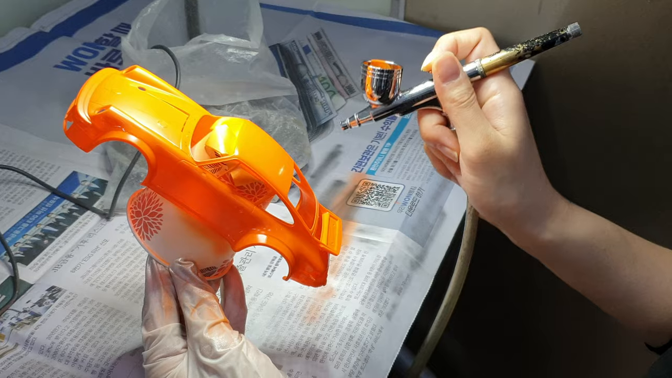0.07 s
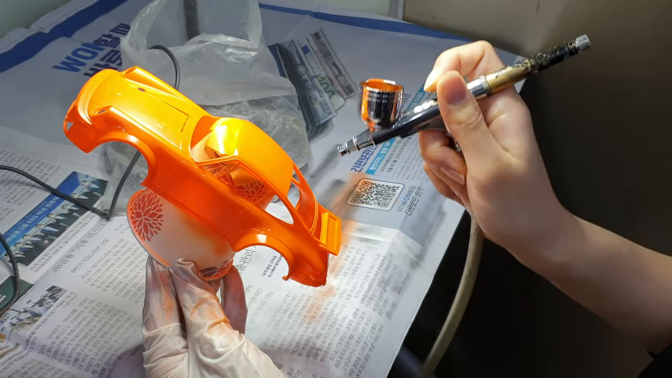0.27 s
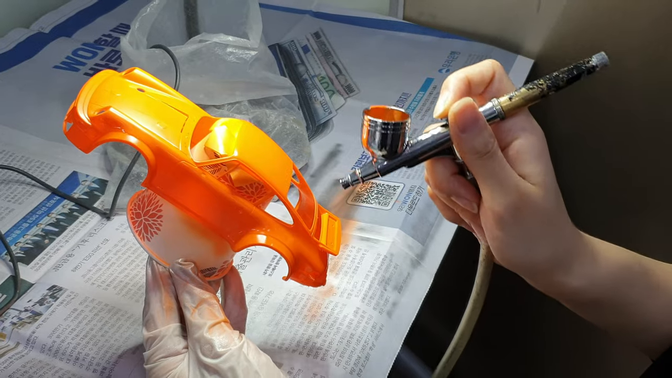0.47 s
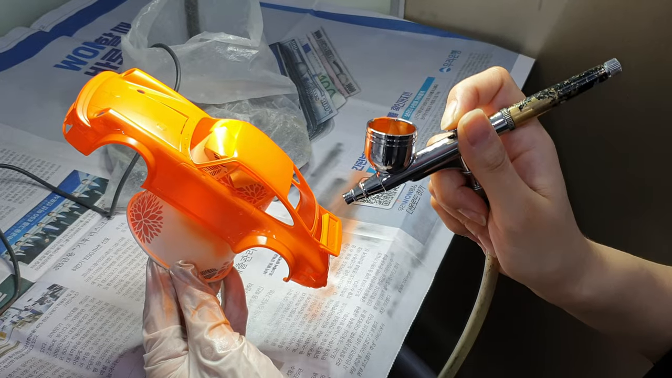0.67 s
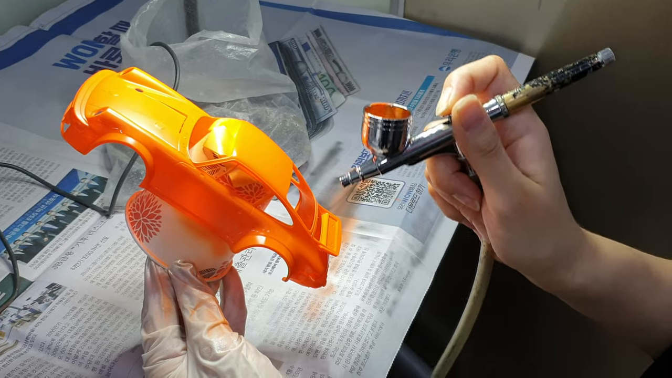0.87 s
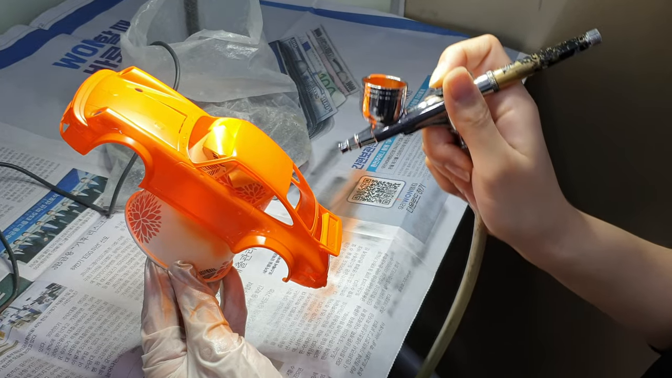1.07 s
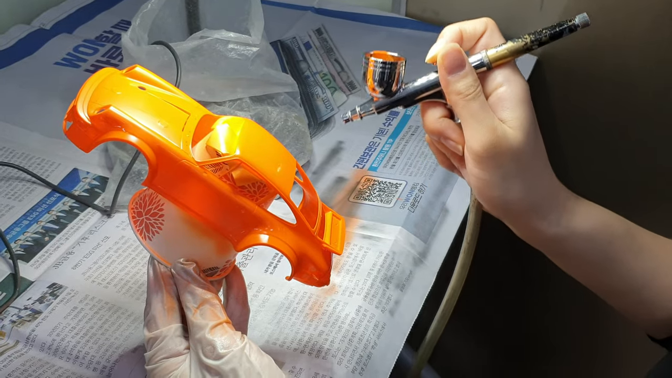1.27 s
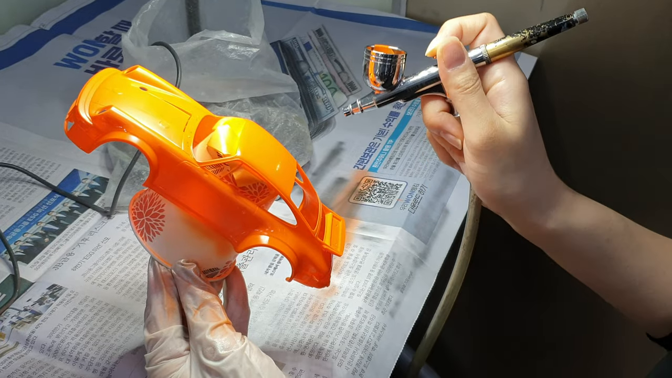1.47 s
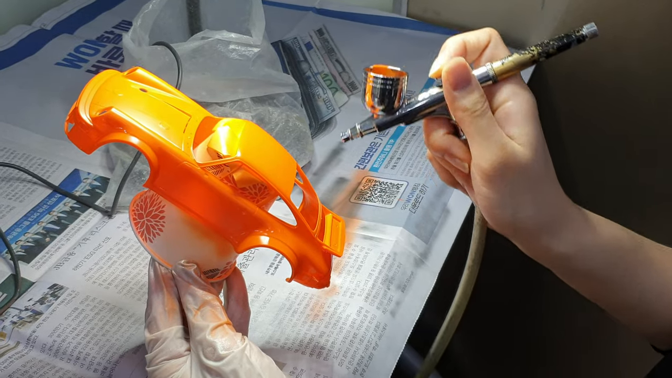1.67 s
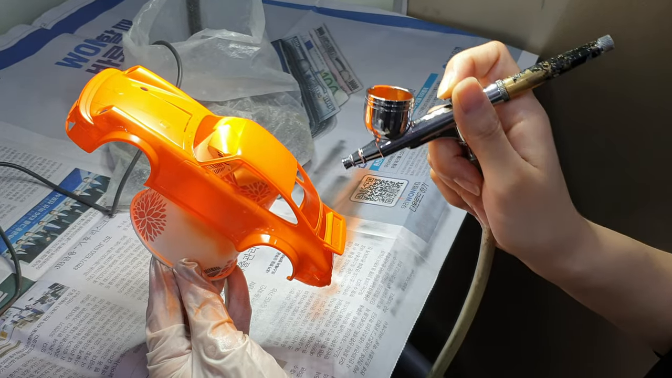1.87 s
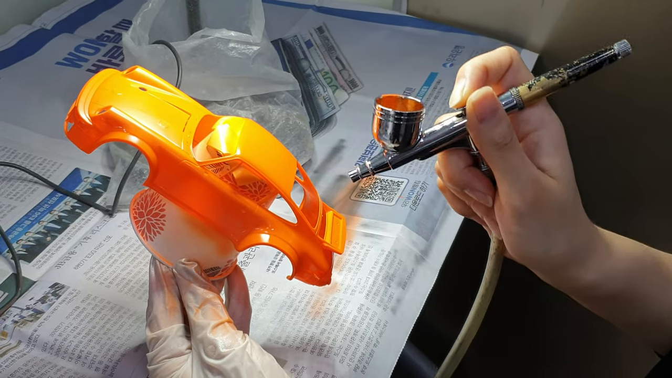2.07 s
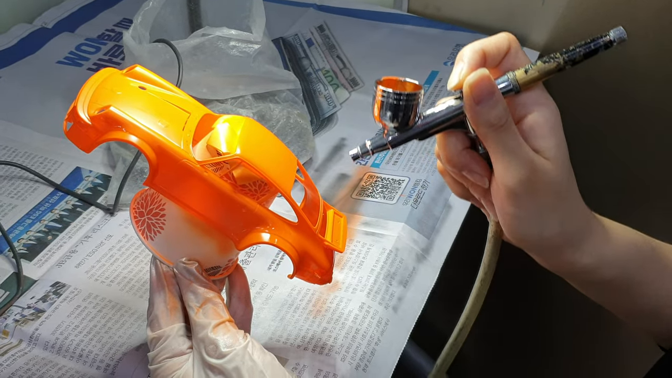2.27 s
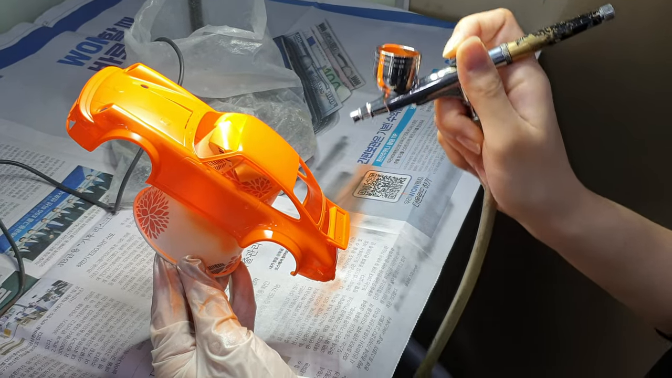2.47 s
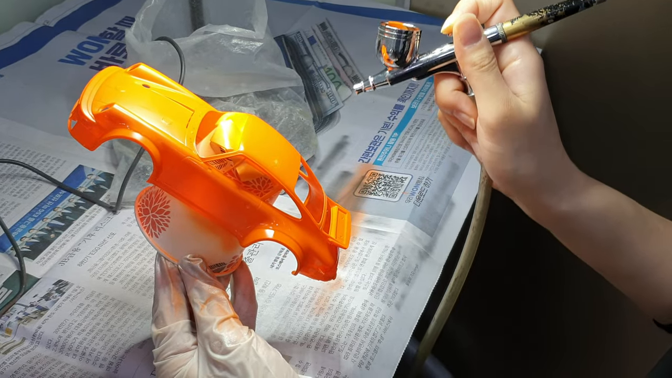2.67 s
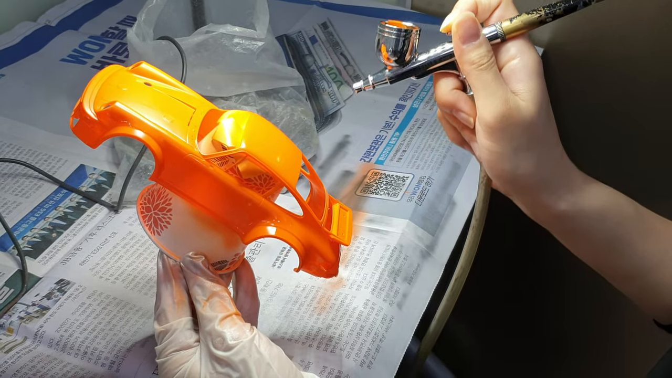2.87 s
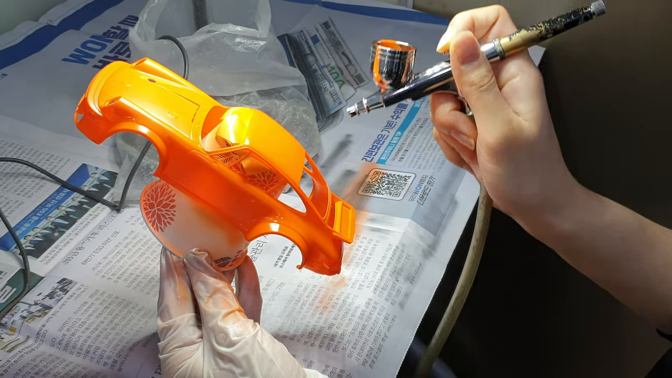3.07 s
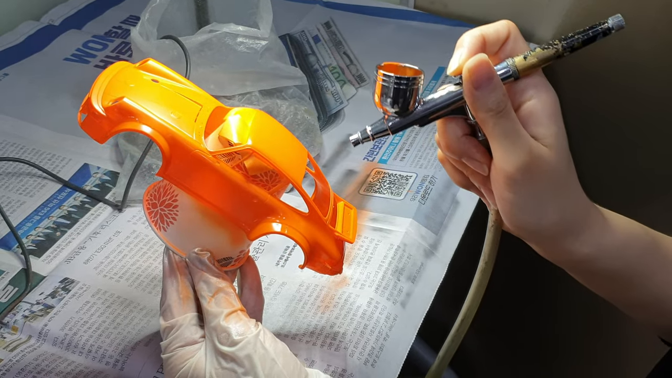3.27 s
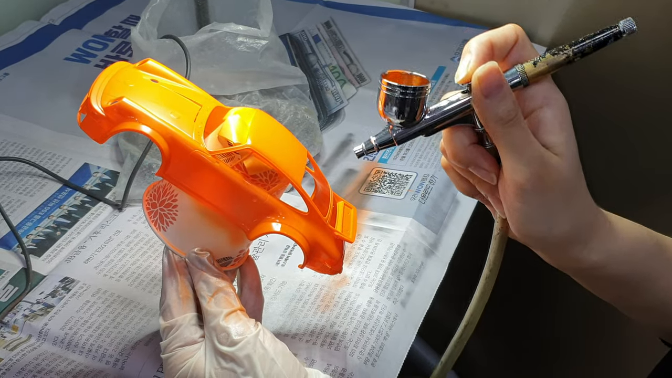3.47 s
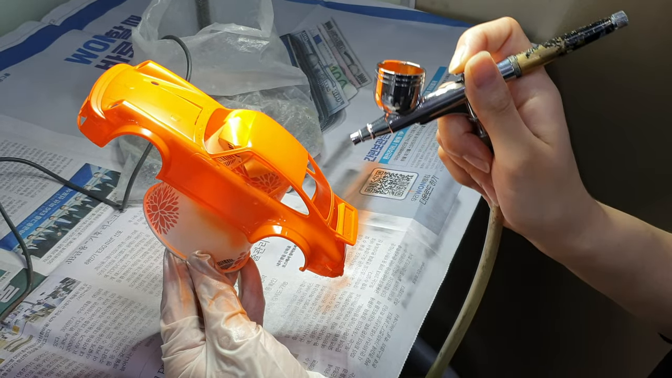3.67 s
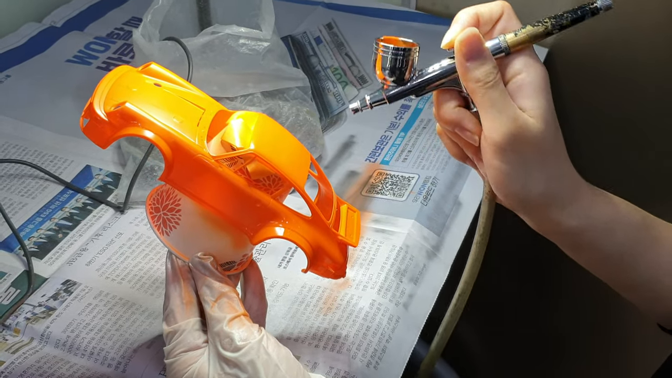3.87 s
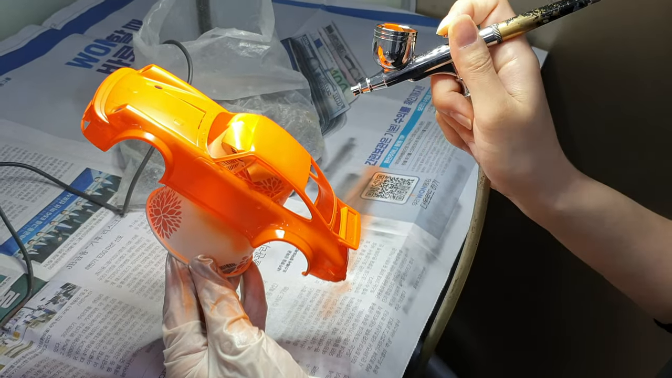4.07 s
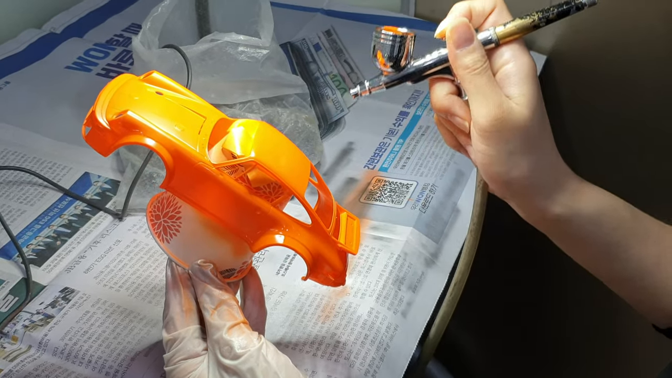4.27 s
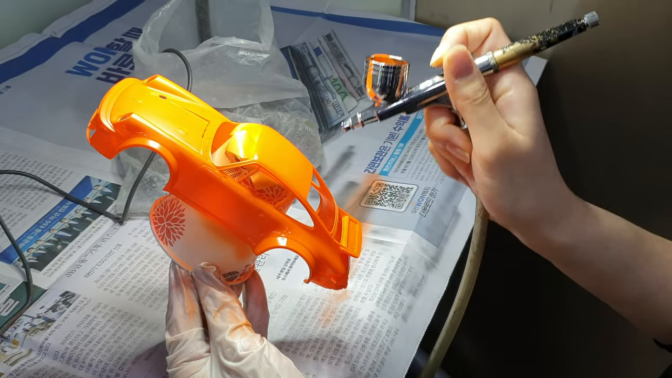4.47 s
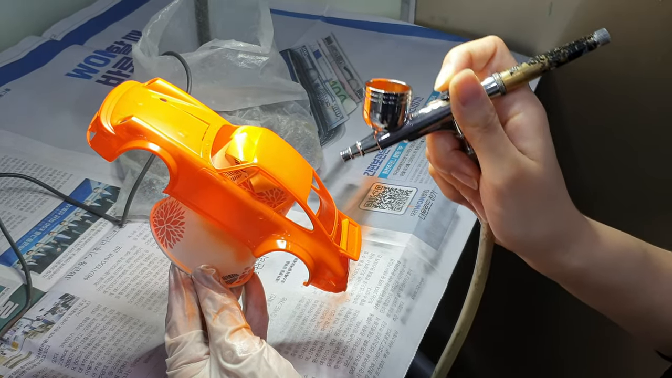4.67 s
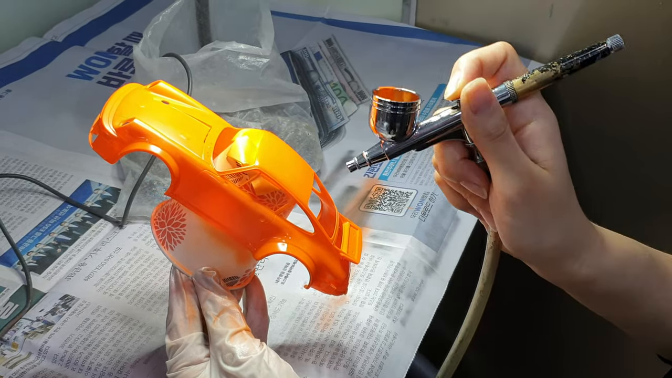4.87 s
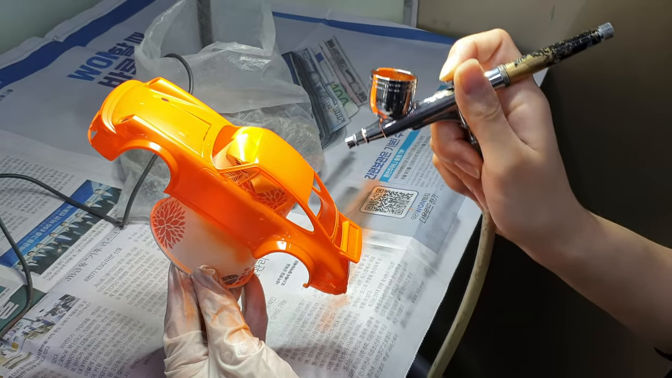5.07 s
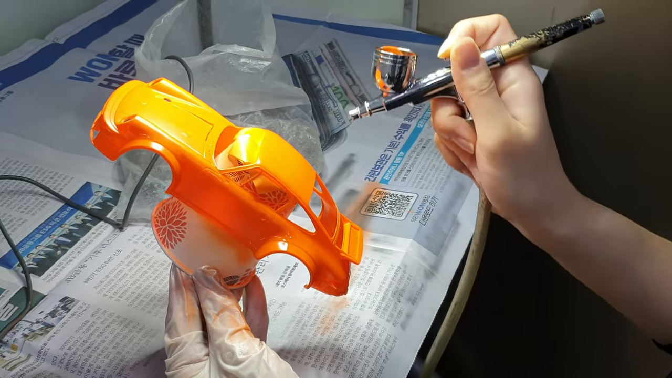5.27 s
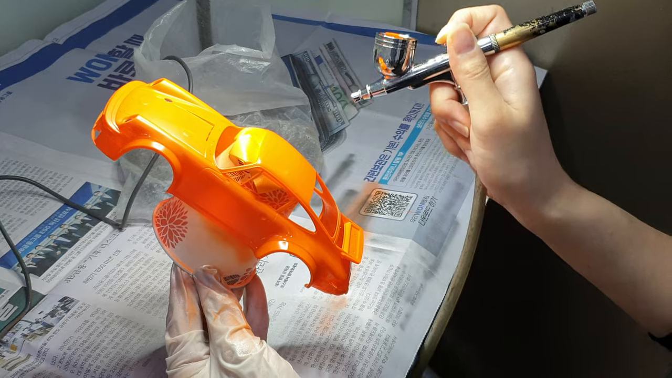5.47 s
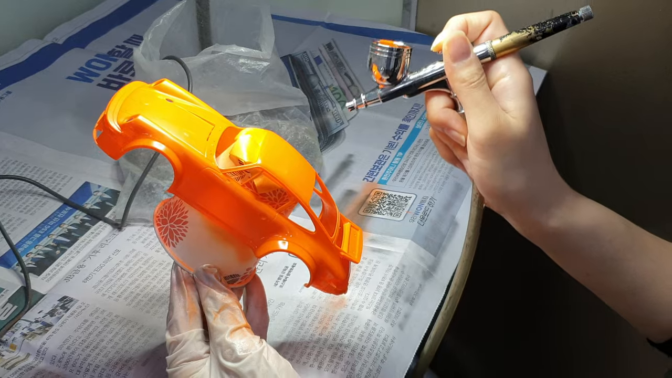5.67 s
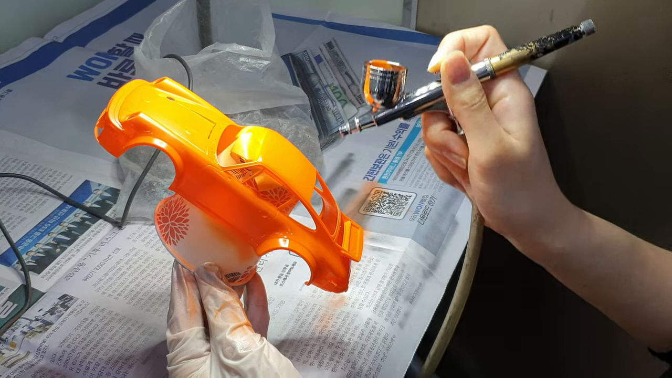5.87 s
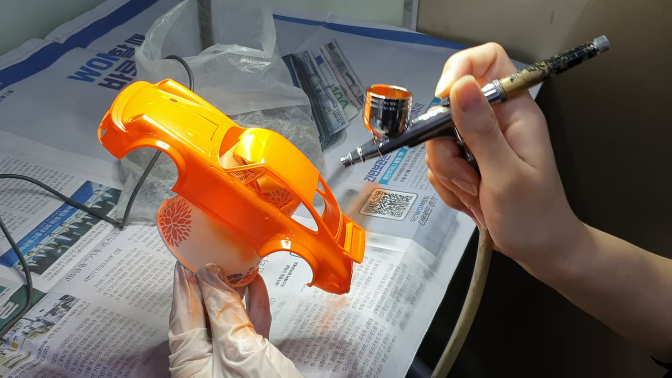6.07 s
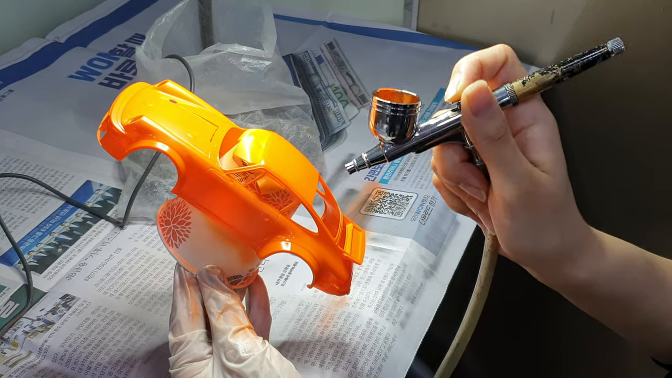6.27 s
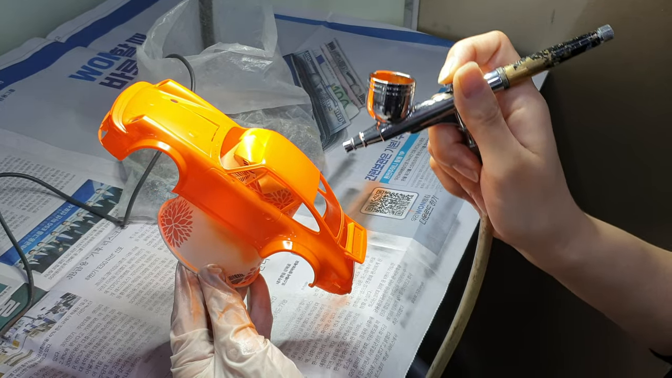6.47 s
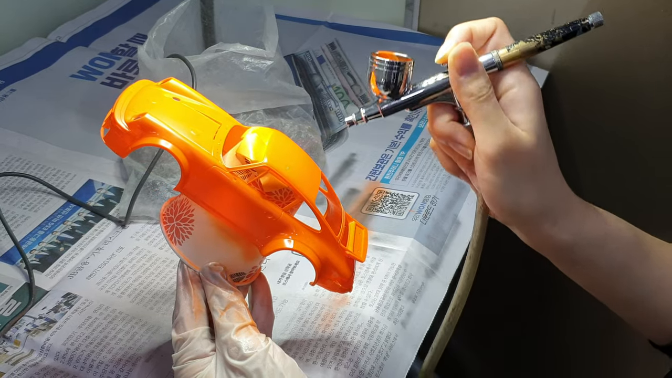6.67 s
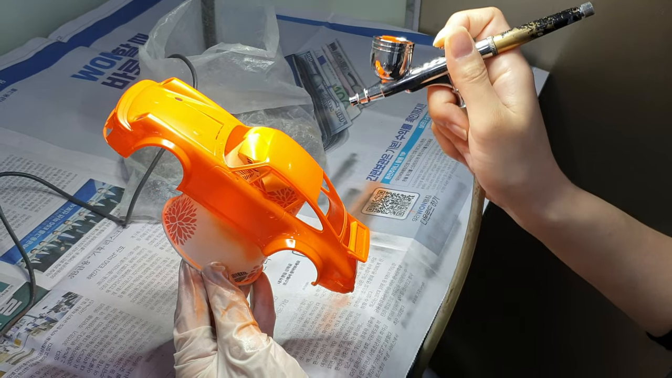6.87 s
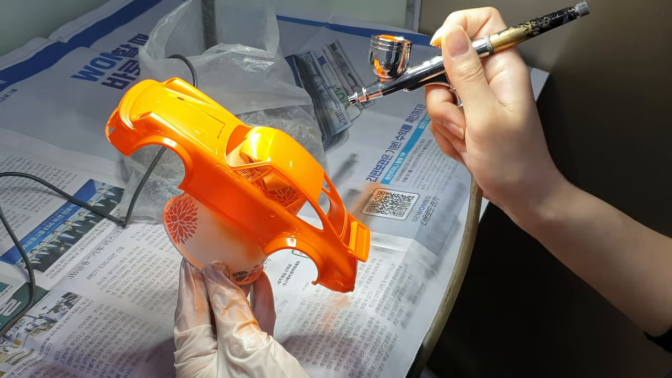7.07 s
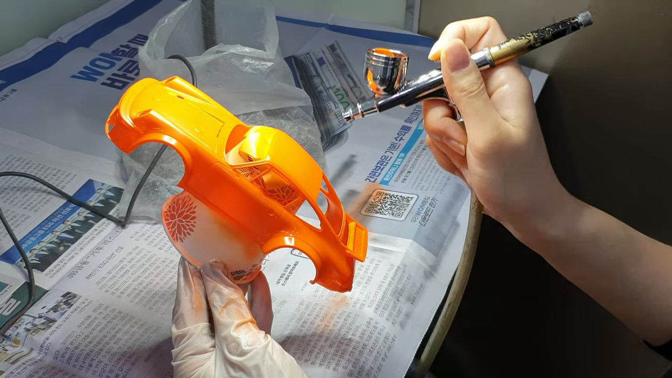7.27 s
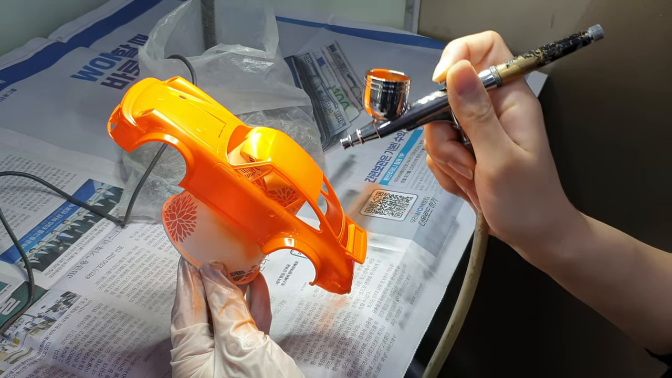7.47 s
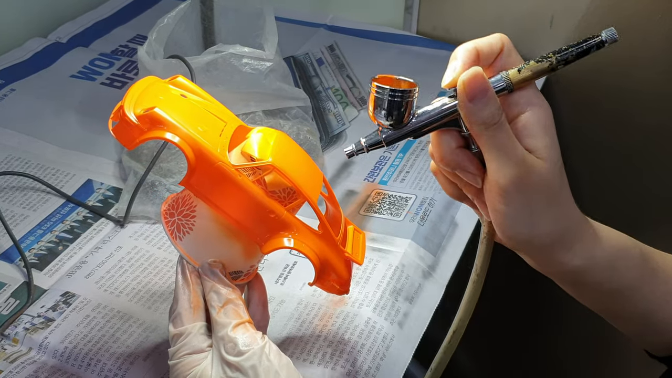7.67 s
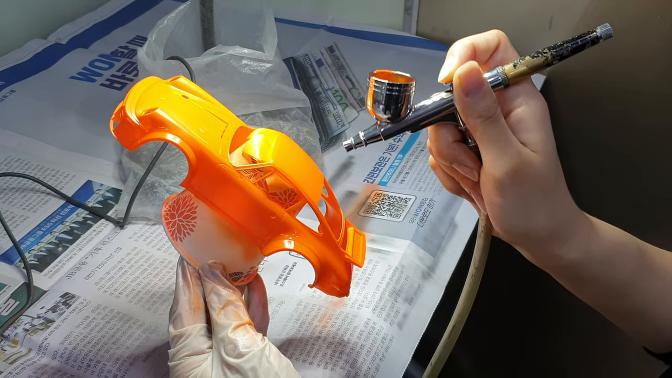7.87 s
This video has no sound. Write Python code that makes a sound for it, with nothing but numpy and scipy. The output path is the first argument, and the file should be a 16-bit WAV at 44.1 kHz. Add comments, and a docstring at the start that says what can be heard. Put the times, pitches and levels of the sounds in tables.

```python
"""An airbrush sweeps up and down over a small model on a table; its jet of air hisses without a break.
Echoes from table, model and hands boost some pitches of the hiss and cancel others, and this
pattern slides with the sweep. Behind it, two small piston compressors and a slower machine
drone in the room, each stroke a soft knock. The volume starts low and is turned up."""
import sys
import numpy as np
from scipy import signal
from scipy.fft import rfft, irfft, next_fast_len
from scipy.io import wavfile

SR = 44100
rng = np.random.default_rng(int(sys.argv[2]) if len(sys.argv) > 2 else 0)


def inscribe(sig):
    """Save sig as 16-bit PCM at rate SR to the path in sys.argv[1].

    A 1-D sig is mono; a 2-D sig holds one channel per row.
    Samples are clipped to [-1, 1] before scaling.
    """
    pcm = np.round(np.clip(np.atleast_2d(sig).T, -1, 1) * 32767)
    wavfile.write(sys.argv[1], SR, pcm.astype(np.int16))


N = 349272
TIME = np.arange(N) / SR
FFT_SIZE = next_fast_len(N + 4000)
BINS_HZ = np.maximum(np.arange(FFT_SIZE // 2 + 1) * SR / FFT_SIZE, 1)
OPPOSITE = np.array([[1], [-1]])   # plus on the left, minus on the right


def from_db(db):
    """Turns decibels into a gain."""
    return 10 ** (np.asarray(db) / 20)


def rms_one(x):
    """Scales a sound to an average power of 1."""
    return x / np.sqrt(np.mean(x ** 2) + 1e-20)


def at_hz(table, hz, column=1):
    """Reads one column of a table at the given frequencies, spaced by octaves."""
    table = np.array(table)
    return np.interp(np.log(hz), np.log(np.maximum(table[:, 0], 1)), table[:, column])


def in_time(table):
    """Turns each column after the time into a curve with one value a sample."""
    times, *columns = np.transpose(table)
    return [np.interp(TIME, times, column) for column in columns]


def filtered(x, response):
    """Gives each frequency its own gain and phase."""
    return irfft(rfft(x, FFT_SIZE) * response, FFT_SIZE)[..., :N]


def drift(rate_hz, count, times=TIME):
    """Slow random curves that stray from zero by about 1."""
    pole = np.exp(-128 * np.pi * rate_hz / SR)
    noise = rng.standard_normal((count, N // 64 + 1502))
    slow = signal.lfilter([1], [1, -2 * pole, pole * pole], noise)[:, 1500:]
    return [np.interp(times * SR / 64, np.arange(len(row)), row / row.std()) for row in slow]


def panned(x, pan_db):
    """Moves a sound left (positive pan) or right (negative pan)."""
    return x * from_db(pan_db * OPPOSITE / 2)


# Tone colour of the rumble: (frequency [Hz], relative level [dB])
RUMBLE_COLOUR = [(21, -24), (36, -8), (54, -2), (64, -8), (90, -11), (130, -19.5), (162, -14), (234, -15),
                 (419, -11), (681, -2), (765, -6), (904, -2), (1020, -5.5), (1160, -2.5), (1470, -14),
                 (1730, -2.5), (1950, -14), (2540, -46), (4290, -120)]
# How alike the rumble is left and right: (frequency [Hz], likeness [-1 to 1])
RUMBLE_LIKENESS = [(60, 1), (130, 1), (290, 0.87), (640, 0.3), (1410, -0.55), (3100, 0.36), (6820, -0.19),
                   (15000, -0.12)]
# Which side the machines are heard on: (frequency [Hz], pan [dB])
MACHINE_PAN = [(60, -5), (110, -3.5), (200, -2.5), (380, -4.5), (700, -0.5), (1290, 0.5), (2380, 1),
               (4400, -13), (8120, -1.0), (15000, -1.5)]
def rumble():
    """Broad noise of the machines; its deepest part is the same left and right."""
    alike = np.clip(at_hz(RUMBLE_LIKENESS, BINS_HZ), -1, 1)
    colour = panned(from_db(at_hz(RUMBLE_COLOUR, BINS_HZ)), at_hz(MACHINE_PAN, BINS_HZ))
    mid_noise, side_noise = rng.standard_normal((2, N))
    mid = filtered(mid_noise, colour * np.sqrt(1 + alike))
    side = filtered(side_noise, colour * np.sqrt(1 - alike))
    return rms_one(mid + side * OPPOSITE)


def drone(stroke_hz, overtones, waver, width):
    """Tones at whole multiples of a stroke rate; the room makes each waver, a bit differently per side."""
    odd_lag_turns, blur_turns = .1, .17
    steps = np.arange(N // 8 + 1) * 8   # low tones need only every 8th sample
    strokes = np.cumsum(np.broadcast_to(stroke_hz, N)[np.minimum(steps, N - 1)]) * 8 / SR
    out = 0
    for multiple, level_db in overtones:
        swell, twist, side_swell, side_twist = drift(1.14, count=4, times=steps / SR)
        whole = round(multiple)
        # The tones meet in a knock each stroke, blurred by the room; odd ones lag, adding a second knock.
        offset = odd_lag_turns * (whole % 2) + blur_turns * rng.standard_normal()
        tone = np.exp(2j * np.pi * (whole * strokes + offset))
        mid = (tone * (1 + waver * (swell + 1j * twist))).real
        side = (tone * width * (side_swell + 1j * side_twist)).real
        pan_db = at_hz(MACHINE_PAN, multiple * np.mean(stroke_hz))
        out = out + panned(from_db(level_db) * (mid + side * OPPOSITE), pan_db)
    return signal.resample_poly(out, 8, 1, axis=1)[:, :N]


# Faint high tones of the machines: (frequency [Hz], level [dB])
FAINT_TONES = [(1494, -28), (1744, -23), (1855, -26), (1900, -29)]
def faint_tones():
    """Thin, wavering tones above the drone."""
    return drone(1, FAINT_TONES, waver=.5, width=.4)   # at 1 Hz, multiples are frequencies


# Hum of the slow machine: (multiple of the stroke rate, level [dB])
SLOW_OVERTONES = [(4, -23), (5, -10), (6, -12.5), (10, -21.5)]
# A wavering hum just below its bass tone: (frequency [Hz], level [dB])
WAVERING_HUM = [(56, -19.5)]
def slow_machine(stroke_hz=19.69):
    """A low hum whose bass throbs against a nearby hum and a compressor's second overtone."""
    hum = from_db(-4.5) * drone(stroke_hz, SLOW_OVERTONES, waver=.084, width=.19)
    bass = drone(stroke_hz, [(3.4, -5.5)], waver=.08, width=.08)   # rounds to the third overtone
    return hum + bass + drone(1, WAVERING_HUM, waver=.74, width=.2)


# Buzz of the steady compressor: (multiple of the stroke rate, level [dB])
STEADY_OVERTONES = [(3, -25), (5, -20), (6, -37), (7, -25.5), (10, -29), (11, -29), (14, -28.5), (16, -21),
                    (18, -23.5), (19, -17.5), (20, -18.5), (21, -13), (22, -12.5), (23, -14.5), (24, -29),
                    (26, -13.5), (30, -32), (31, -37), (32, -29), (48, -15)]
def steady_compressor(stroke_hz=24.63):
    """A small piston knocks at an even pace, fast enough to buzz."""
    return from_db(-2) * drone(stroke_hz, STEADY_OVERTONES, waver=.34, width=.35)


# Speed of the other compressor's piston: (time [s], stroke rate [Hz])
STROKE_RATE = [(.1, 27.8), (3.4, 27.82), (3.55, 27.76), (4.42, 27.87), (5.51, 27.76), (6.7, 27.86),
               (7.18, 27.77), (7.9, 27.89)]
# Its buzz: (multiple of the stroke rate, level [dB])
BUZZ_OVERTONES = [(2, -24), (3, -15.5), (4, -15.5), (5, -34), (9, -26.5), (12, -23.5), (13, -26.5),
                  (14, -28), (15, -22.5), (16, -19.5), (17, -15), (20, -23), (21, -15), (22, -11),
                  (26, -13), (27, -12), (28, -15), (29, -16.5), (30, -6.5), (31, -13.5), (33, -7.5),
                  (34, -15), (35, -23), (36, -17), (38, -17.5), (39, -14.5), (40, -27), (41, -9), (42, -14),
                  (43, -17), (44, -16), (46, -16.5), (47, -17), (48, -21.5)]
# How its whine swells and fades: (time [s], swell [dB])
WHINE_SWELL = [(.15, -10.5), (2.12, -9.5), (2.45, -15.5), (2.7, -12.5), (2.97, -6), (3.22, -16), (3.5, -17),
               (3.7, -6.5), (3.92, -9.5), (4.3, -16), (4.95, -14.5), (5.26, -7.5), (5.55, -17),
               (6.05, -14.5), (6.29, -9), (6.58, -16), (7.07, -16), (7.25, -8), (7.44, -8.5), (7.62, -17),
               (7.92, -15)]
# Its whine: (multiple of the stroke rate, base level [dB], share of the swell added [negative = sinks])
WHINE_OVERTONES = [(19, -22, -0.86), (24, -11.5, -0.054), (25, 5.5, 0.83), (23, -14, 0.18), (32, -3.5, 0.4)]
def whining_compressor():
    """A piston whose speed wanders under its load, with a whine that comes and goes."""
    stroke_hz, = in_time(STROKE_RATE)
    swell_db, = in_time(WHINE_SWELL)
    out = from_db(-2.5) * drone(stroke_hz, BUZZ_OVERTONES, waver=.21, width=.24)
    for multiple, level_db, share in WHINE_OVERTONES:
        whine = drone(stroke_hz, [(multiple, level_db)], waver=.068, width=.18)
        out += from_db(share * swell_db) * whine
    return out


# Where the hand turns round: (time [s], nozzle height [0 low to 1 high])
TURNING_POINTS = [(.05, 1.), (.75, 0.), (1.45, .9), (2.12, .1), (2.8, 1.), (3.52, 0.), (4.25, 1.),
                  (4.9, .1), (5.62, 1.), (6.3, .1), (7.05, 1.), (7.78, 0.), (8.5, 1.)]
def nozzle_height():
    """The hand sweeps up and down, slowing at each turn."""
    times, heights = np.transpose(TURNING_POINTS)
    progress = np.interp(TIME, times, np.arange(len(times)))
    turn = np.minimum(progress.astype(int), len(times) - 2)
    eased = (1 - np.cos(np.pi * (progress - turn))) / 2
    return heights[turn] + (heights[turn + 1] - heights[turn]) * eased


# Narrow bands that stand out of the hiss, with the nozzle low and high:
# (pitch low [Hz], pitch high [Hz], width [Hz], level low [dB], level high [dB], pan [dB])
WHISTLE_BANDS = [(6280, 5780, 400, -13, -18, -14), (5100, 5750, 150, -32, -15, -3),
                 (5450, 6120, 180, -30, -17, -3), (11380, 14000, 520, -2, -9, 6),
                 (13430, 13000, 530, -15, -5, 0)]
def airy_whistles(height):
    """Narrow bands of noise whose pitch and level follow the nozzle's height."""
    out = 0
    for low_hz, high_hz, width_hz, low_db, high_db, pan_db in WHISTLE_BANDS:
        lowpass = signal.butter(2, width_hz / 2, fs=SR, output="sos")
        slow_noise = signal.sosfilt(lowpass, rng.standard_normal((2, N)))
        phase = 2 * np.pi * np.cumsum(low_hz + (high_hz - low_hz) * height) / SR
        band = rms_one(slow_noise[0] * np.cos(phase) + slow_noise[1] * np.sin(phase))
        out = out + panned(from_db(low_db + (high_db - low_db) * height) * band, pan_db)
    return out


def clutter_paths(count=8, shrink=.11):
    """Small echoes off things on the table: later ones are fainter, all come sooner as the nozzle rises."""
    low_ms = rng.uniform(1.5, 6, (count, 2))
    high_ms = low_ms * (1 - shrink * rng.uniform(.2, 1.8, (count, 2)))
    level_db = -9 - .5 * low_ms
    return np.column_stack([low_ms[:, 0], high_ms[:, 0], low_ms[:, 1], high_ms[:, 1], level_db])


# Delays from nozzle to listener with the nozzle low and high, the straight path first:
# (left low [ms], left high [ms], right low [ms], right high [ms], left level [dB], right level [dB])
SOUND_PATHS = [(0., .006, 0., 0., 0., 0.), (.53, .4, .41, .55, -11, -9), (.9, .74, .86, .76, -12, -11),
               (1.36, 1.28, 1.42, 1.3, -9, -14), (1.95, 1.78, 1.9, 1.76, -14, -14),
               (2.45, 2.16, 2.38, 2.05, -7, -11), (2.85, 2.65, 2.9, 2.7, -10, -7),
               (4.1, 3.8, 4.3, 3.9, -11, -13)]
def jet_with_echoes(height, stray_share=.03, echo_cut_hz=5200):
    """The noise of swirling air arrives along many paths, whose lengths change as the hand moves."""
    substeps = 12   # steps a sample, so that delays slide smoothly
    noise = substeps * irfft(rfft(rng.standard_normal(FFT_SIZE)), substeps * FFT_SIZE)
    now = substeps * (np.arange(N) + 1000)
    paths = np.vstack([SOUND_PATHS, clutter_paths()])
    sideways, = drift(.6, count=1)   # the hand also strays sideways
    direct, echoes = np.zeros((2, 2, N))
    for index, path in enumerate(paths):
        arrival = echoes if index else direct
        for ear in range(2):
            low_ms, high_ms = path[2 * ear:2 * ear + 2]
            stray_ms = stray_share * rng.uniform(-1, 1) * low_ms * sideways
            delay_ms = low_ms + (high_ms - low_ms) * height + stray_ms
            lag = (delay_ms * substeps * SR / 1000).astype(int)
            arrival[ear] += from_db(path[4 + ear]) * noise[now - lag]
    # Small things throw back only short waves, so the echoes keep just the treble.
    highpass = signal.butter(2, echo_cut_hz, "high", fs=SR, output="sos")
    return direct + signal.sosfilt(highpass, echoes)


# Hiss spread round the room: (frequency [Hz], level against the direct jet [dB])
ROOM_HISS = [(1400, 9), (4500, 0.5), (6500, -0.5), (10000, -3.5), (15000, -5)]
# Tone colour of the hiss: (frequency [Hz], left relative level [dB], right relative level [dB])
HISS_COLOUR = [(1350, -19, -15.5), (1970, -27, -17), (2470, -20, -13), (2750, -18, -13.5), (3290, -24, -22),
               (4260, -18.5, -17.5), (5250, -21.5, -9.5), (5580, -17, -6.5), (6630, -11.5, -6.5),
               (7300, -7.5, -8), (8070, -15, -22), (8880, -14, -13.5), (10900, -3.5, -2.5),
               (11500, -2.5, -8.5), (12850, -1, -3), (13500, -0.5, 1.5), (14350, 2.5, 4.5), (14950, 13, 0),
               (15350, 10, 12), (15800, 14.5, 3.5)]
# How far the left wave runs ahead of the right: (frequency [Hz], lead [radians])
LEFT_LEAD = [(0, 0), (1000, .2), (1800, 3.1), (2500, 1.5), (4200, 2.5), (5200, 1), (6200, 3.3), (7500, 3.7),
             (8300, 6.6), (9500, 9.2), (11000, 11.2), (12000, 12.9), (12800, 15.3), (13600, 15.9),
             (15000, 17.2), (16000, 18.4)]
def jet_hiss(height, low_cut_hz=1500):
    """The jet, its echoes and the room's hiss, coloured by the microphone openings."""
    jet = jet_with_echoes(height)
    room = filtered(rng.standard_normal((2, N)), from_db(at_hz(ROOM_HISS, BINS_HZ)))
    colour = from_db([at_hz(HISS_COLOUR, BINS_HZ, column) for column in (1, 2)])
    lead = np.exp(.5j * at_hz(LEFT_LEAD, BINS_HZ) * OPPOSITE)
    low_cut = 1 / np.sqrt(1 + (low_cut_hz / BINS_HZ) ** 8)
    return filtered(jet + room, colour * lead * low_cut)


def split_bands(hiss, edges_hz, softness_hz=700):
    """Cuts the hiss into soft-edged bands, each centred and brought to the same strength."""
    below = [0] + [1 / (1 + (BINS_HZ / hz) ** (hz / softness_hz)) for hz in edges_hz] + [1]
    bands = [filtered(hiss, upper - lower) for lower, upper in zip(below, below[1:])]
    centred = [band / band.std(axis=1, keepdims=True) for band in bands]
    return [band / band.mean(axis=0).std() for band in centred]


# How the hiss follows the nozzle: (height [0 to 1], spray level [dB], body level [dB],
# bright level [dB], body pan [dB], bright pan [dB], top pan [dB])
HISS_BY_HEIGHT = [(0, -7, -3, 3, -1, 0.81, -2.5), (.3, -5.5, -6, 3.9, -1, -0.77, -1),
                  (.55, -5, -3, 2.3, -0.5, -0.14, -1), (.8, -5.5, -1, 2.1, -3.5, 1, -2.5),
                  (1, -6.5, -2.5, 2.1, -2.5, 1.8, -1)]
# Slow change of the body band: (time [s], added level [dB])
BODY_CHANGE = [(.12, 0.5), (.6, 1.5), (1.3, 1), (1.9, 0), (2.6, 0), (3.3, 0), (4.5, 1), (5.1, 0),
               (6.2, 0.5), (7.92, -1.5)]
# Slow change of the treble: (time [s], added bright level [dB], bright pan [dB], top pan [dB])
TREBLE_CHANGE = [(.12, -0.5, 0, -2), (.4, -1, 0, 3), (.9, -1, 0, 3), (1.5, 0, 0, -2), (1.85, -1.5, -1, 2),
                 (2.2, 0, -0.17, 2), (2.7, 2.5, 1.5, 4), (3.3, -0.7, -1.4, 4), (3.85, -0.5, -1, 4),
                 (4.1, 1.5, 0, 1), (4.6, -1.5, -0.79, -1), (5.2, -1.2, 0.16, 5), (5.85, -1.5, 1, -3),
                 (6.3, -2.5, 2, 1), (6.7, 1.7, 1, 2), (6.9, -1.5, 1, -1), (7.35, -1.5, -1, -4),
                 (7.55, -0.66, 0.65, 1), (7.92, 0, 2, 0)]
# The two highest bands, volume included: (time [s], top level [dB], very top level [dB])
TOP_LEVELS = [(0.1, -56, -56), (0.47, -60, -60), (0.88, -57, -54), (0.99, -58, -58), (1.27, -54, -53),
              (1.84, -56, -57), (2.55, -44.5, -49), (2.95, -44, -33), (2.99, -38, -38), (3.25, -44, -43),
              (3.29, -40, -36), (3.83, -43, -41), (4.1, -39, -34), (4.6, -38.5, -38), (4.64, -40.5, -44),
              (5.12, -41, -43), (5.16, -47, -43), (5.44, -35.5, -34), (5.57, -42, -36), (5.59, -41, -32),
              (5.9, -37.5, -36), (6.05, -39, -41), (6.33, -42, -29), (6.72, -43, -43), (6.83, -36.5, -32),
              (7.33, -37, -34), (7.46, -36, -41), (7.62, -46, -34), (7.81, -45, -25), (7.9, -39, -35)]
def airbrush(height, volume_db, flicker_db=1.16):
    """The hiss in five flickering bands, low to high: spray on the model, body, bright, top, very top."""
    heights, *columns = np.transpose(HISS_BY_HEIGHT)
    spray_db, body_db, bright_db, body_pan, bright_pan, top_pan = [
        np.interp(height, heights, column) for column in columns]
    slow_body_db, = in_time(BODY_CHANGE)
    slow_bright_db, slow_bright_pan, slow_top_pan = in_time(TREBLE_CHANGE)
    top_db, very_top_db = in_time(TOP_LEVELS) - volume_db   # scene() adds the volume back
    spray_db += 5 * np.exp(-((TIME - 1.06) / .15) ** 2)   # the spray swells once
    levels_db = [spray_db, body_db + slow_body_db, bright_db + slow_bright_db, top_db, very_top_db]
    pans_db = [-2.9, body_pan, bright_pan + slow_bright_pan] + 2 * [top_pan + slow_top_pan]
    bands = split_bands(jet_hiss(height), edges_hz=(5050, 9120, 13240, 14540))
    flickers = drift(6, count=5)
    return sum(from_db(level_db + flicker_db * flicker) * panned(band, pan_db)
               for band, level_db, pan_db, flicker in zip(bands, levels_db, pans_db, flickers))


# The volume being turned up: (time [s], level [dB])
OVERALL_VOLUME = [(.1, -62), (1.73, -59), (2.3, -50), (2.92, -43), (7.92, -43)]
def scene():
    """Machines and airbrush play together and follow one volume curve."""
    volume_db, = in_time(OVERALL_VOLUME)
    height = nozzle_height()
    compressors = whining_compressor() + steady_compressor()
    machines = compressors + slow_machine() + faint_tones() + from_db(-1.5) * rumble()
    return from_db(volume_db) * (machines + airbrush(height, volume_db) + airy_whistles(height))


def record(dry):
    """After a moment of silence the sound sets in quickly; the highest treble is cut steeply."""
    start_s, fade_s, cutoff_hz = .068, .0028, 15730
    fade_in = np.clip((TIME - start_s) / fade_s, 0, 1)
    lowpass = signal.ellip(14, .3, 75, cutoff_hz, fs=SR, output="sos")
    return signal.sosfilt(lowpass, dry * fade_in)


dry = scene()
out = record(dry)
inscribe(out)
```